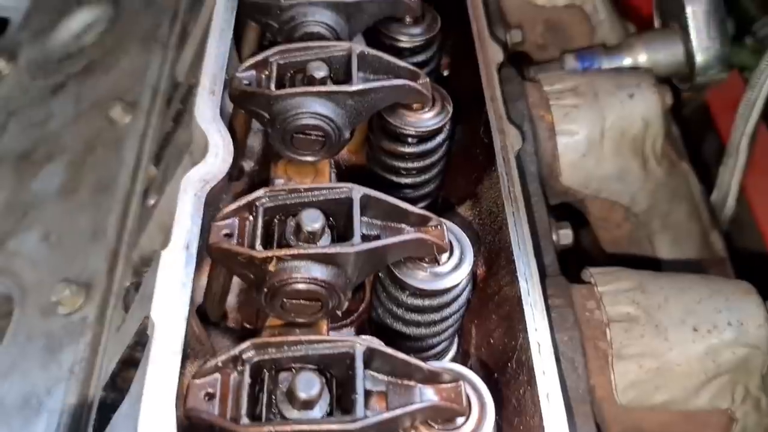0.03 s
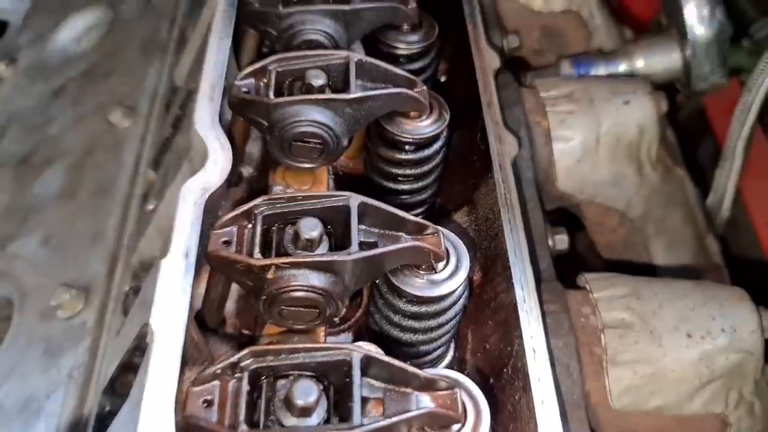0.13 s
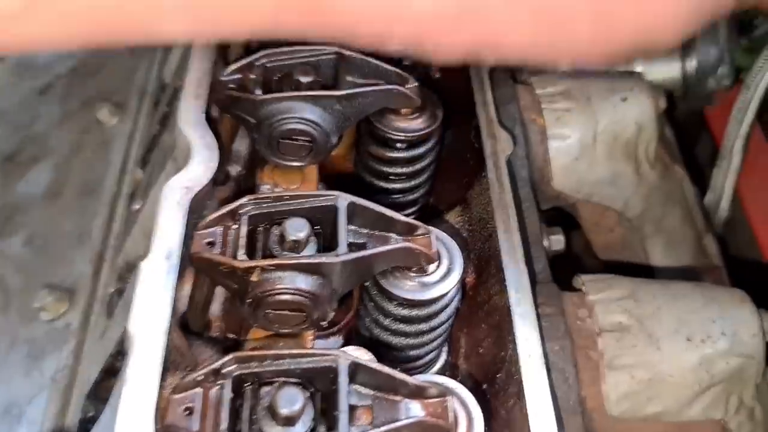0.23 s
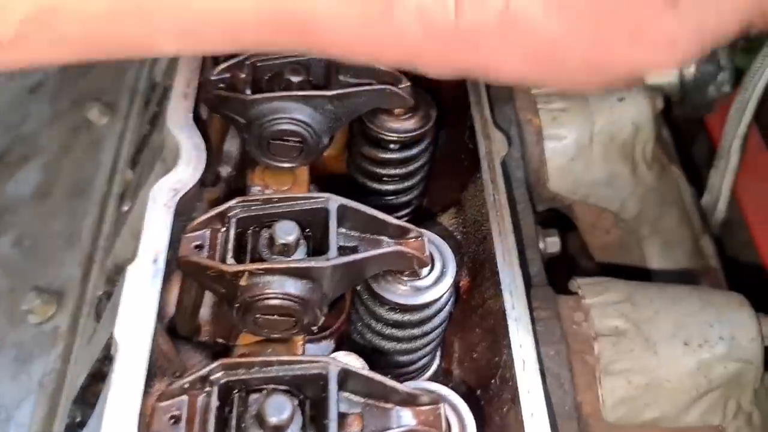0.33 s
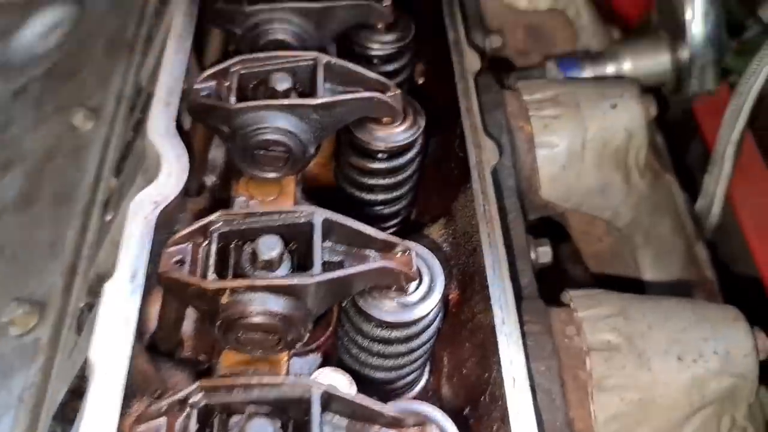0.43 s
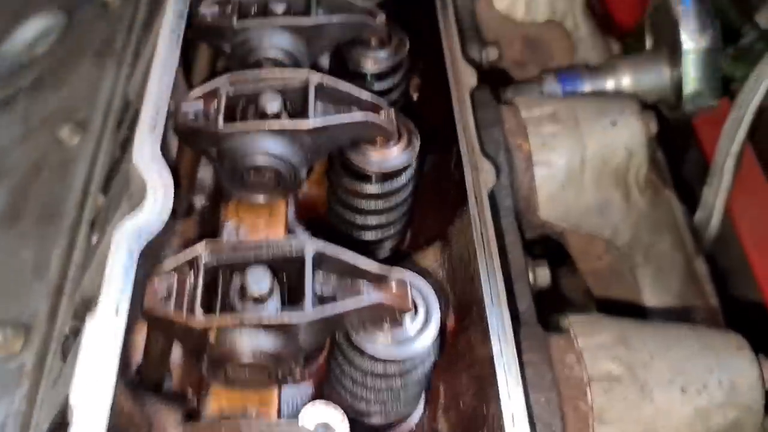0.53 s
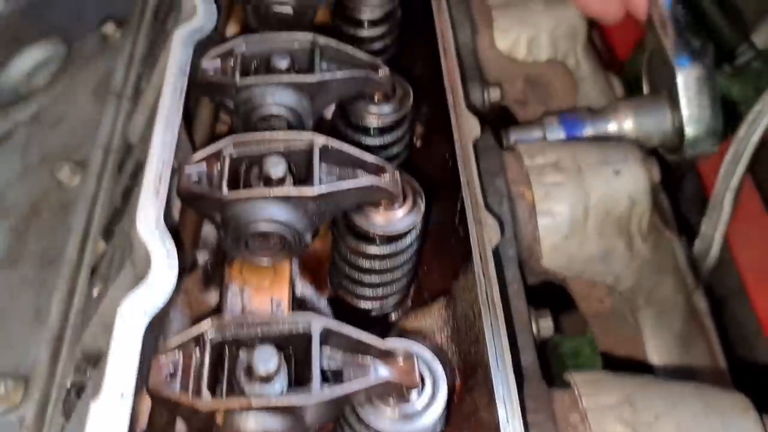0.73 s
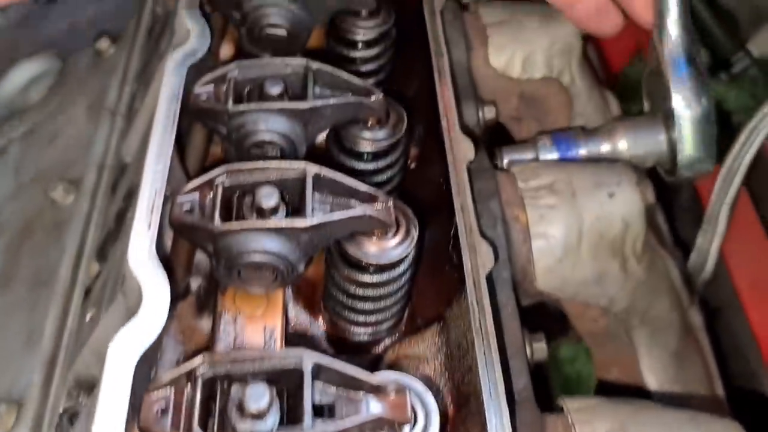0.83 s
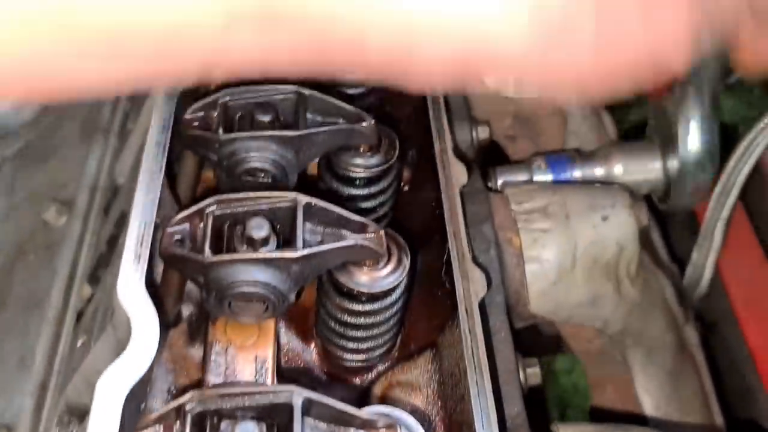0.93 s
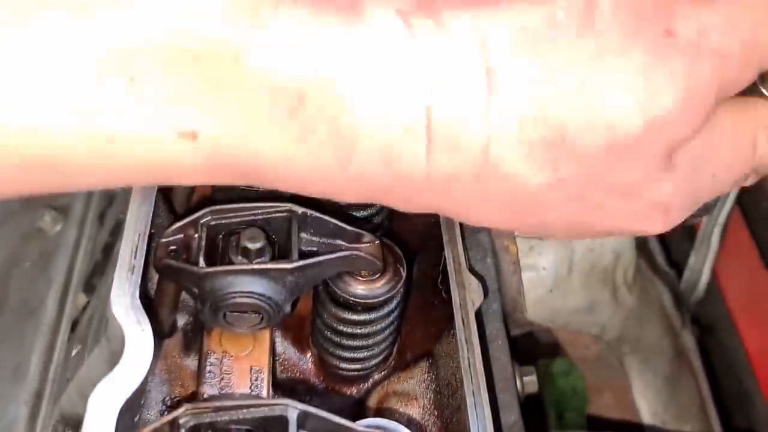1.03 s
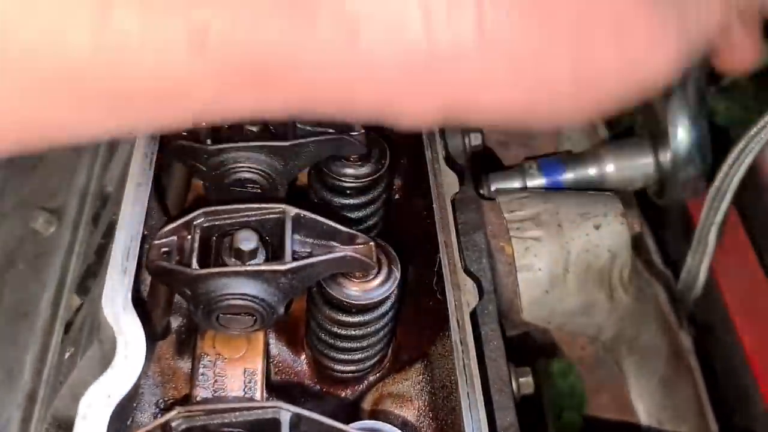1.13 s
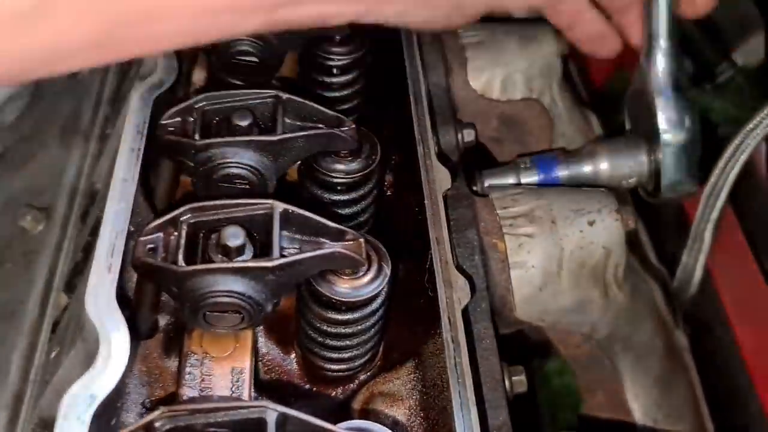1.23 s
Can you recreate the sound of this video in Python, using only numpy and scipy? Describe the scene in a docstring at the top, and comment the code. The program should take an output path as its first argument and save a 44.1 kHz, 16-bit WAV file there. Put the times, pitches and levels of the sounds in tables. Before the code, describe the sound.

Sharp ratchet clicks in two short bursts, with light steel knocks and rubbing, in a workshop

```python
"""Two socket knocks come first, then a socket ratchet swings back on an engine in a run of pawl clicks.
More knocks and rubbing steel fill the pause; a second run, small squeaks and a last knock follow.
Clicks and knocks are shaped noise plus damped modes; rubbing is grainy noise plus sustained modes.
The engine bay scatters the blows, sheet metal rings along, and a diffuse room tail answers.
Faint hisses come and go, over a steady low hum of coloured noise."""
import sys
import numpy as np
from scipy import signal
from scipy.fft import rfft, irfft, next_fast_len
from scipy.io import wavfile
from scipy.ndimage import map_coordinates

SR = 44100
rng = np.random.default_rng(int(sys.argv[2]) if len(sys.argv) > 2 else 0)


def master_out(mix):
    """Clip the mix to full scale and print it as 16-bit PCM to the path in sys.argv[1]."""
    frames = np.transpose(np.atleast_2d(mix))
    ceiling = np.clip(frames, -1, 1)
    pcm = np.round(ceiling * 32767).astype(np.int16)
    wavfile.write(sys.argv[1], SR, pcm)


N = 57330  # length in samples


def amp(db):
    """Level law: 20 dB is a factor of ten in amplitude."""
    return 10 ** (np.asarray(db) / 20)


def unit(x):
    """Normalization to an rms of 1."""
    return x / np.sqrt(np.mean(x ** 2) + 1e-20)


def along(points, hz):
    """Interpolation of (Hz, value) points on a logarithmic frequency axis."""
    point_hz, values = np.transpose(points)
    return np.interp(np.log(hz + 1), np.log(point_hz + 1), values)


def filtered(x, response):
    """Linear filtering: the spectrum of x times a response of frequency."""
    n = x.shape[-1]
    padded = next_fast_len(n + 8192)
    spectrum = rfft(x, padded) * response(np.fft.rfftfreq(padded, 1 / SR))
    return irfft(spectrum, padded)[..., :n]


def wobble(rate, n):
    """Random modulation: a smooth curve through random knots, rate knots a second."""
    at = np.arange(n) * rate / SR
    return map_coordinates(rng.standard_normal(N // 8), [at], mode="wrap")


def noise(spectrum, side, n, tilt_db=0):
    """Mid-side stereo: independent coloured noises, tilted in dB per octave about 3 kHz, rms 1."""
    def colour(hz):
        return along(spectrum, hz) + tilt_db * np.log2((hz + 100) / 3000)

    def mid_side_gain(hz):
        return amp([colour(hz), colour(hz) + along(side, hz)])

    mid, side_signal = filtered(rng.standard_normal((2, n)), mid_side_gain)
    return unit(np.array([mid + side_signal, mid - side_signal]))


def panned(db):
    """Level difference between the channels: left over right in dB, split between the two gains."""
    return amp([[db / 2], [-db / 2]])


def add(out, s, sound):
    """Superposition: add a sound into out at s seconds, cut at both ends of out."""
    i = round(s * SR)
    part = sound[:, max(-i, 0):N - i]
    out[:, max(i, 0):][:, :part.shape[1]] += part


def struck(t, attack, t60):
    """Impulsive excitation: a fast rise, and an exponential fall of 60 dB in t60."""
    return (1 - np.exp(-t / attack)) * np.exp(-np.log(1000) * t / t60)


BLUR_RAD = 0.33  # scale of the random phase drift


def ring(modes, t, attack=0.001, scatter_db=-0.73):
    """Modal superposition: damped sines of random level, their phase blurred by nearby surfaces."""
    out = 0
    for hz, db, t60, pan_db, lag in modes:
        drift = BLUR_RAD * np.array([wobble(450, len(t)), wobble(400, len(t))])
        phase = 2 * np.pi * (hz * t + rng.random()) + drift + np.array([[lag], [0]])
        level = amp(db + scatter_db * rng.standard_normal())
        out = out + level * panned(pan_db) * struck(t, attack, t60) * np.sin(phase)
    return out


# Width of the scattered sound. Each row: frequency in Hz, side level against the middle in dB.
BAY_SIDE = [(300, -5), (1200, -5.5), (2500, 4), (6000, 1.5), (14000, -1)]


def scattered(spectrum, n, tilt_db=0, ripple_db=3, ripple_hz=170):
    """Multipath interference: the engine bay walls give noise uneven spectral peaks and dips."""
    knots = rng.standard_normal((2, 400))

    def ripple(hz):
        curves = [map_coordinates(k, [hz / ripple_hz], mode="wrap") for k in knots]
        return amp(ripple_db * np.array(curves))

    return unit(filtered(noise(spectrum, BAY_SIDE, n, tilt_db), ripple))


# Pawl clicks. Each row: time in s, base level in dB, lead of the first touch in s, first touch in dB,
# handle ring, head ring and socket ring in dB against the base level, left-right difference in dB.
CLICKS = [(0.2162, -17, 0.006, -7.5, -3, -10.5, 8, -1.5), (0.2581, -18.5, 0.0024, -19, 0.5, -12, 2.5, -1),
          (0.2946, -20, 0.0014, -6.5, -6.5, -23, 2.5, 1), (0.3445, -20, 0.0028, -5, -1, -17, -0.5, -1),
          (0.9595, -18.5, 0.0014, -5, -2, 4.5, 1.5, -2.5), (0.9994, -18.5, 0.001, -2.5, -4, 5.5, 6, -4),
          (1.0396, -17.5, 0.0015, -2.5, -1.5, 1, -4, 0), (1.1053, -19, .0076, -5.5, -9.5, -29, 10.5, -1.5)]
# Free modes of the tool's parts. Each row: frequency in Hz, mean level in dB, t60 in s,
# left-right difference in dB, phase between the sides in rad.
HANDLE_MODES = [(2978, 1.5, 0.053, 5, 2.31)]
HEAD_MODES = [(3227, 0.005, 0.026, -0.82, 1.1)]
SOCKET_MODES = [(6168, 2.5, 0.032, -3.5, 1.98), (5640, -17, 0.057, -0.5, 1.1)]
PAWL_MODES = [(7500, -15.5, 0.022, 4, 0.6), (10350, -10, 0.017, 0.5, 1.3), (10990, -8.5, 0.065, -10.5, 2),
              (13600, -10.5, 0.04, -5, 1.1)]
# Spectrum of a crack. Each row: frequency in Hz, relative level in dB.
CRACK_SPECTRUM = [(200, -37), (1100, -13.5), (2400, -7), (3100, 0), (3700, -4), (5400, 1), (8000, -1.5),
                  (10500, 2.5), (14500, -1), (16000, -9.5)]
CRACK_DB, CRACK_ATTACK_S, CRACK_T60_S = 1.5, 0.00092, 0.046
SNAP_DB, SNAP_T60_S = 2, 0.0042  # the short, sharp snap at the start of each blow
RIDE_DB, RIDE_S = -12.5, 0.003  # scrape up the tooth: level against the crack, growth time constant
TOUCH_T60_S = 0.014


def ratchet(grain_db=2.5):
    """Impact excitation: the pawl rides up, touches and slams home; returns cracks and tool rings."""
    cracks, rings = np.zeros((2, N)), np.zeros((2, N))
    t = np.arange(SR // 5) / SR
    for s, db, lead, touch_db, handle_db, head_db, socket_db, pan_db in CLICKS:
        size = amp(db + CRACK_DB) * panned(pan_db)
        # the scrape swells up to the click and stops there
        ride = amp(RIDE_DB) * np.exp((t - t[-1]) / RIDE_S)
        add(cracks, s - t[-1], size * ride * scattered(CRACK_SPECTRUM, len(t)))

        snap = amp(SNAP_DB) * struck(t, 0.0003, SNAP_T60_S)
        for at, share_db, t60 in [(s - lead, touch_db, TOUCH_T60_S), (s, 0, CRACK_T60_S)]:
            grain = amp(grain_db * wobble(SR / 40, len(t)))
            chatter = struck(t, CRACK_ATTACK_S, t60) * grain
            blow = (snap + chatter) * scattered(CRACK_SPECTRUM, len(t))
            add(cracks, at, size * amp(share_db) * blow)

        parts = [(HANDLE_MODES, handle_db), (HEAD_MODES, head_db),
                 (SOCKET_MODES, socket_db), (PAWL_MODES, 0)]
        for modes, share_db in parts:
            add(rings, s, amp(db + share_db) * ring(modes, t))
    return cracks, rings


# Socket knocks and light touches of the pawl. Each row: time in s, base level in dB, treble tilt in
# dB per octave, tool ring in dB, contact pitch in Hz, contact ring in dB; rings against the base level.
KNOCKS = [(0.138, -43.5, -1, 2, 1810, -9), (0.1749, -35.5, 6, -4.5, 11080, 2.5),
          (0.4523, -38, -0.5, -1.5, 3500, -10), (0.4839, -33.2, 1.8, -1, 3400, 2.5),
          (0.8498, -27.5, 1.3, -4, 5560, 4.5), (0.92, -37.5, 6, -9, 1915, 1.5),
          (1.1979, -34, -2.5, -5, 4470, -2)]
# Spectrum of a knock before its tilt. Each row: frequency in Hz, relative level in dB.
KNOCK_SPECTRUM = [(220, -35), (480, -12), (760, -10), (1200, -1), (2300, -7), (3000, -3), (3700, -5),
                  (5200, -5.5), (8000, -13), (15000, -24)]
# The tool's modes when it bears on the bolt, quickly damped. Each row: frequency in Hz,
# mean level in dB, t60 in s, left-right difference in dB, phase between the sides in rad.
LOADED_MODES = [(2790, -1, 0.041, 9.5, 0.99), (1260, -20, 0.037, -0.5, 0.5)]
KNOCK_ATTACK_S, KNOCK_T60_S = 0.0012, 0.065
KNOCK_TOUCH_S, KNOCK_TOUCH_DB = 0.0032, -14  # lead of the light touch, its level against the knock
SEAT_S, SEAT_DB = 0.012, -23  # the socket scrapes ever harder before it seats: time constant, level
CONTACT_T60_S = 0.026


def knocks():
    """Loaded impact: the socket takes up its play by scrape, touch and snap; the place sets the ring."""
    out = np.zeros((2, N))
    t = np.arange(SR // 5) / SR
    for s, db, tilt_db, ring_db, contact_hz, contact_db in KNOCKS:
        snap = amp(SNAP_DB) * struck(t, KNOCK_ATTACK_S, SNAP_T60_S)
        body = struck(t, KNOCK_ATTACK_S, KNOCK_T60_S) + snap
        scrape = amp(SEAT_DB) * np.exp((t - t[-1]) / SEAT_S)
        touch = amp(KNOCK_TOUCH_DB) * body
        for at, shape in [(s - t[-1], scrape), (s - KNOCK_TOUCH_S, touch), (s, body)]:
            add(out, at, amp(db) * shape * scattered(KNOCK_SPECTRUM, len(t), tilt_db))

        contact = ring([(contact_hz, contact_db, CONTACT_T60_S, 0, 1)], t)
        add(out, s, amp(db) * (amp(ring_db) * ring(LOADED_MODES, t) + contact))
    return out


# Steel rubbing as the handle turns. Each row: start in s, length in s, level in dB.
RUBS = [(0.219, 0.049, -34.5), (0.269, .055, -44), (0.815, 0.19, -57), (0.985, 0.086, -42.5)]
# Spectrum of the rubbing. Each row: frequency in Hz, relative level in dB.
RUB_SPECTRUM = [(200, -36), (560, -5), (760, -14.5), (1200, 1), (2100, -4), (3700, -7), (6000, -8),
                (14000, -19)]
RUB_RING_DB = -2.5  # gain of the sustained rings


def rubbing(grain_db=5):
    """Friction excitation: dense small jerks of steel on steel sustain the handle and socket modes."""
    out = np.zeros((2, N))
    t = np.arange(SR // 4) / SR
    # an infinite t60 removes the decay
    sustained = [(hz, db + RUB_RING_DB, np.inf, pan_db, lag)
                 for hz, db, _, pan_db, lag in HANDLE_MODES + SOCKET_MODES]
    for s, length, db in RUBS:
        n = int(length * SR)
        jerks = amp(grain_db * np.tanh(2 * wobble(600, len(t))))
        grainy = unit(scattered(RUB_SPECTRUM, len(t)) * jerks)
        rub = (grainy + ring(sustained, t))[:, :n]
        add(out, s, amp(db) * rub * signal.windows.tukey(n, 0.5))
    return out


# Brief squeaks. Each row: start in s, length in s, mean pitch in Hz, level in dB,
# level of the octave against the fundamental in dB.
SQUEAKS = [(0.921, .024, 1546, -40, 4), (1.049, 0.021, 2900, -31.5, -15), (1.253, 0.043, 361, -51.5, -26)]
SQUEAK_WAVER, SQUEAK_WAVER_RATE = 0.015, 300  # fraction of the pitch, knots a second


def squeaks():
    """Stick-slip oscillation: short wavering tones, each a fundamental and its octave."""
    out = np.zeros((2, N))
    for s, length, hz, db, octave_db in SQUEAKS:
        n = int(length * SR)
        pitch = hz * (1 + SQUEAK_WAVER * wobble(SQUEAK_WAVER_RATE, n))
        side_lag = np.array([[hz / 2000], [0]])  # rad
        phase = 2 * np.pi * np.cumsum(pitch) / SR + side_lag
        swell = np.sin(np.pi * np.arange(n) / n)
        tone = np.sin(phase) + amp(octave_db) * np.sin(2 * phase)
        add(out, s, amp(db) * swell * tone)
    return out


# Modes of the sheet metal. Each row: frequency in Hz, relative level in dB, t60 in s.
SHEET_MODES = [(1025, -32, 0.31), (1063, -34, 0.45), (1238, -35.5, 0.2), (1324, -40, 0.2),
               (1818, -27.5, 0.21)]
SHEET_DB = -6  # gain of all sheet modes


def sheet_metal(knock_gain_db=9):
    """Structure-borne coupling: blows leave a thin cover ringing; knocks get extra gain on their level."""
    out = np.zeros((2, N))
    t = np.arange(SR // 2) / SR
    blows = [row[:2] for row in CLICKS]
    blows += [(s, db + knock_gain_db) for s, db, *_ in KNOCKS]
    for s, db in blows:
        tone = 0
        for hz, level, t60 in SHEET_MODES:
            sine = np.sin(2 * np.pi * (hz * t + rng.random()))
            tone = tone + amp(level) * struck(t, 0.0015, t60) * sine
        add(out, s, amp(db + SHEET_DB) * panned(-6) * tone)
    return out


# Faint hisses, likely of slow sliding. Each row: start in s (below zero: already under way),
# length in s, centre in Hz, half-width in Hz, mean level in dB.
SLIDES = [(-.06, 0.29, 1780, 89, -60), (-.08, 0.37, 1400, 980, -65), (.615, 0.17, 5960, 640, -76),
          (.898, 0.043, 1820, 240, -45), (1.24, 0.1, 1690, 170, -57), (1.21, 0.22, 4530, 1900, -60.5)]


def sliding(waver_db=2.5):
    """Band-limited noise: each faint hiss keeps to one resonance-shaped band and wavers in level."""
    out = np.zeros((2, N))
    for s, length, centre, width, db in SLIDES:
        n = int(length * SR)
        white = rng.standard_normal((2, n))
        band = unit(filtered(white, lambda hz: 1 / (1 + ((hz - centre) / width) ** 2)))
        level = amp(db + waver_db * wobble(65, n))
        add(out, s, level * band * signal.windows.tukey(n, 0.5))
    return out


# Reverberation time of the workshop. Each row: frequency in Hz, t60 in s.
ROOM_T60 = [(300, 0.4), (2000, 0.22), (6000, 0.22), (10000, 0.52), (15000, 0.1)]
# Colour of the reverberation. Each row: frequency in Hz, gain in dB.
ROOM_COLOUR = [(1200, -0.5), (3000, -12), (6000, -17), (10000, -23.5)]
ROOM_BUILD_S = 0.0023  # time constant of the rise


def workshop(x):
    """Diffuse reverberation: convolution with noise whose decay time depends on frequency."""
    hz, t, z = signal.stft(rng.standard_normal((2, SR * 3 // 4)), SR, nperseg=256)
    t60 = along(ROOM_T60, hz)[:, None]
    z = z * struck(t, ROOM_BUILD_S, t60)
    z = z / np.sqrt(t60)  # offsets the greater energy of slow decays
    tail = signal.istft(z, SR, nperseg=256)[1]
    wet = signal.fftconvolve(x, tail / np.linalg.norm(tail[0]), axes=1)[:, :N]
    return filtered(wet, lambda f: amp(along(ROOM_COLOUR, f)))


# Spectrum of the background. Each row: frequency in Hz, relative level in dB.
HUM_SPECTRUM = [(20, -13), (55, -6), (75, 4.5), (95, -7.5), (120, -1), (180, -12.5), (380, -7.5),
                (600, -23), (1500, -34.5), (15000, -47.5)]
# Width of the background. Each row: frequency in Hz, side level against the middle in dB.
HUM_SIDE = [(250, -15), (1000, 0)]
HUM_DB = -60.5


def hum():
    """Stationary random noise: a steady low hum, strongest near 75 Hz."""
    return amp(HUM_DB) * noise(HUM_SPECTRUM, HUM_SIDE, N)


RING_ROOM_DB = -6  # share of the tool rings that feeds the room


def scene():
    """Superposition of direct sound, structure-borne ring, reverberation and background."""
    cracks, rings = ratchet()
    tool = cracks + knocks() + rubbing() + squeaks()
    room = workshop(tool + amp(RING_ROOM_DB) * rings)
    return tool + rings + sliding() + sheet_metal() + room + hum()


TOP_HZ = 15700  # band limit


def record(dry):
    """Band limitation: a very steep low-pass, 3 dB down at the band limit."""
    return filtered(dry, lambda hz: 1 / np.sqrt(1 + (hz / TOP_HZ) ** 120))


dry = scene()
out = record(dry)
master_out(out)
```